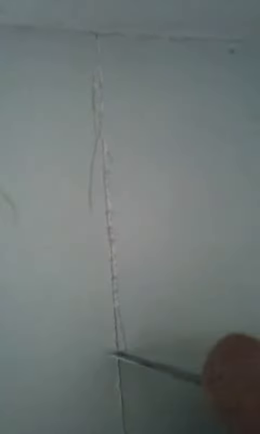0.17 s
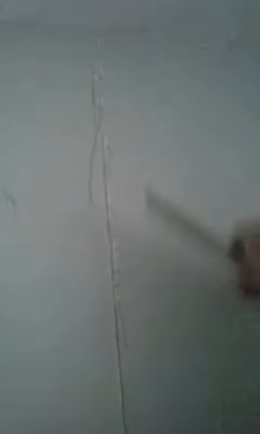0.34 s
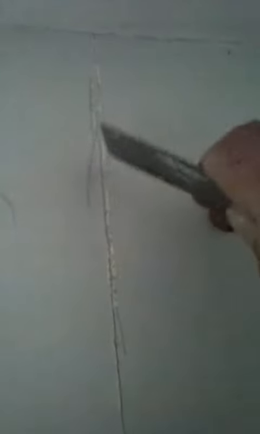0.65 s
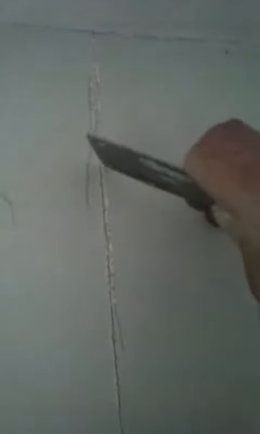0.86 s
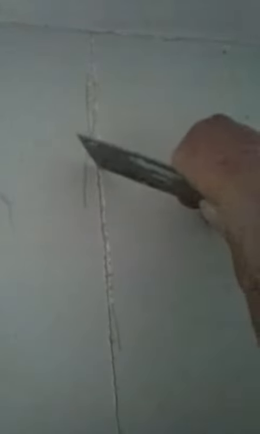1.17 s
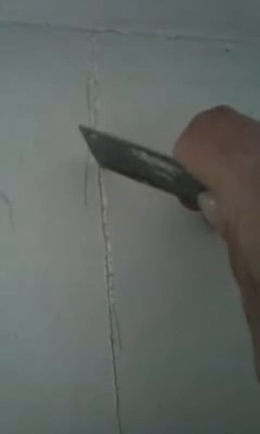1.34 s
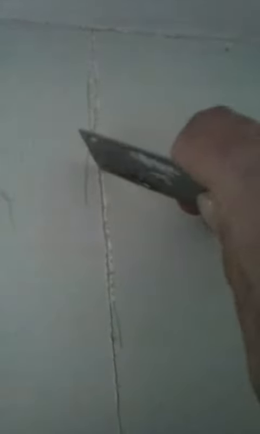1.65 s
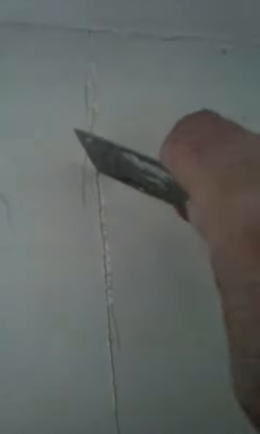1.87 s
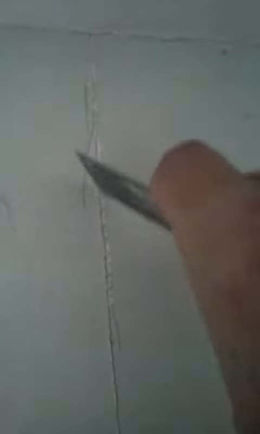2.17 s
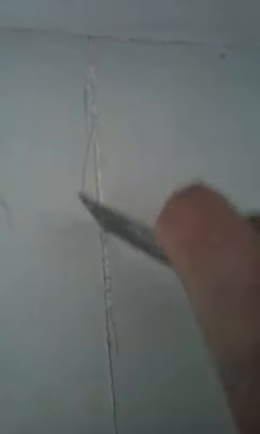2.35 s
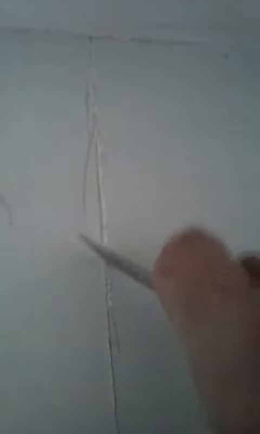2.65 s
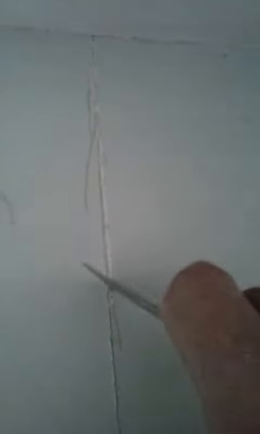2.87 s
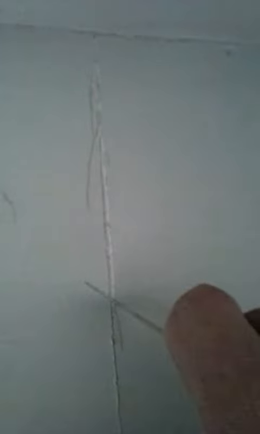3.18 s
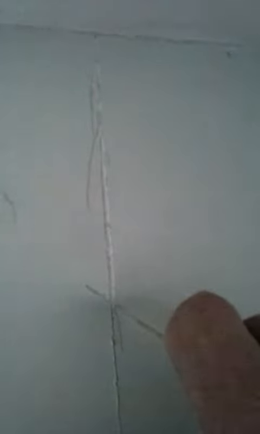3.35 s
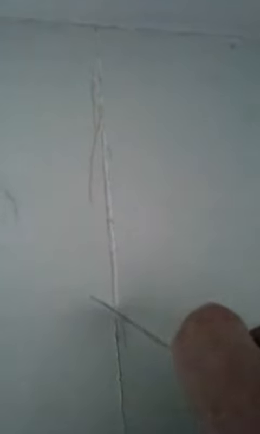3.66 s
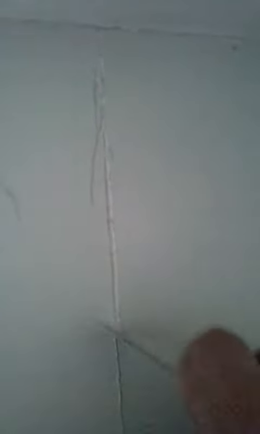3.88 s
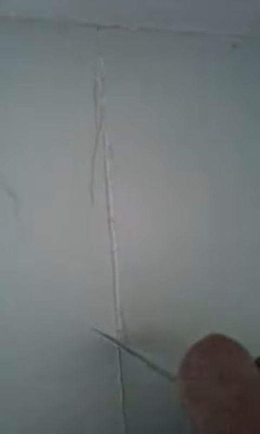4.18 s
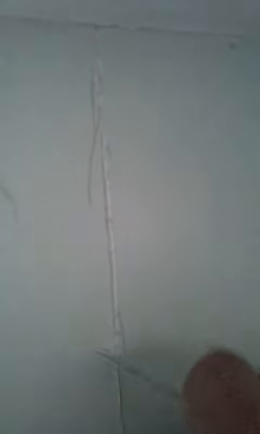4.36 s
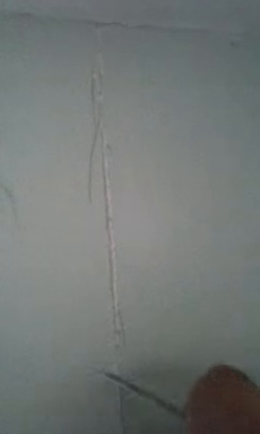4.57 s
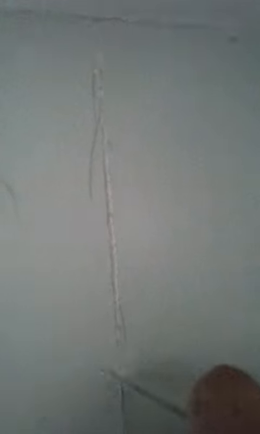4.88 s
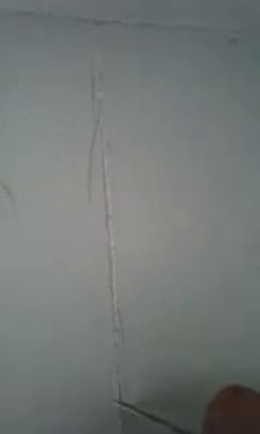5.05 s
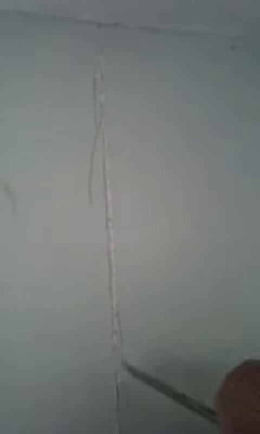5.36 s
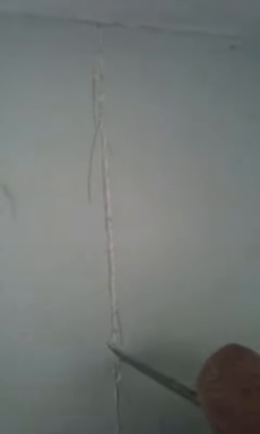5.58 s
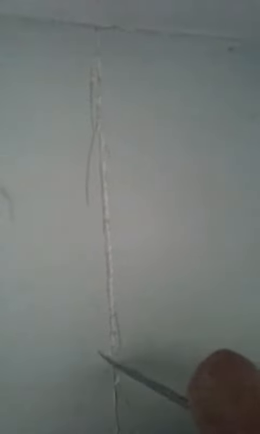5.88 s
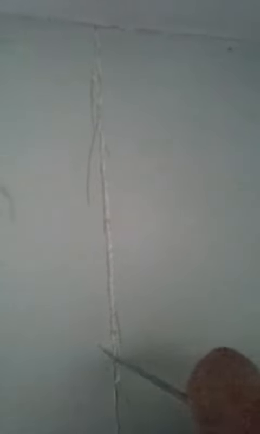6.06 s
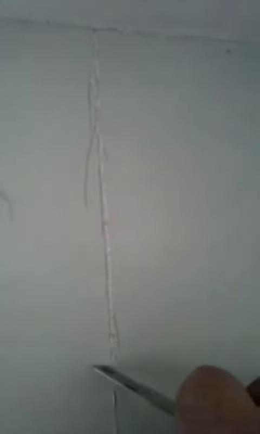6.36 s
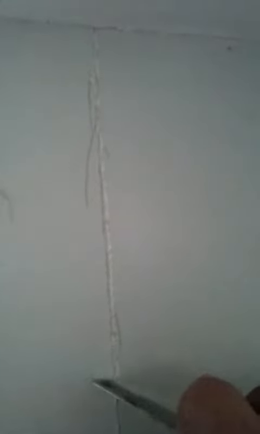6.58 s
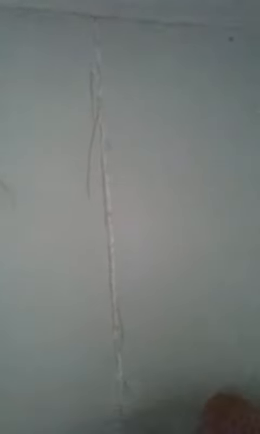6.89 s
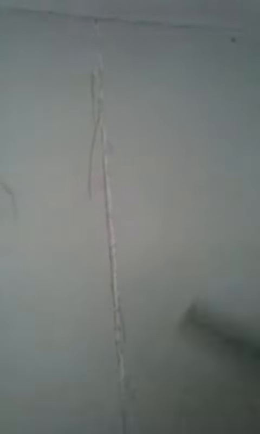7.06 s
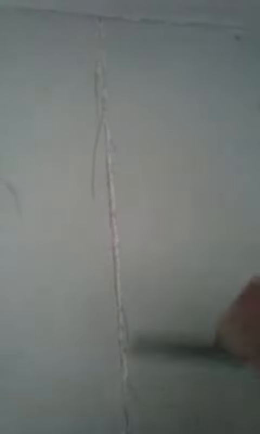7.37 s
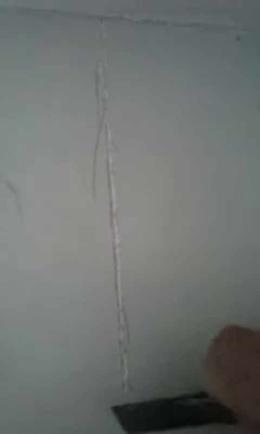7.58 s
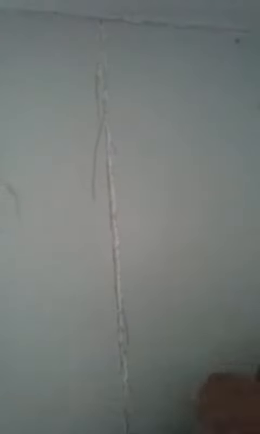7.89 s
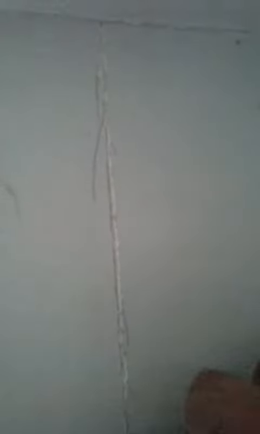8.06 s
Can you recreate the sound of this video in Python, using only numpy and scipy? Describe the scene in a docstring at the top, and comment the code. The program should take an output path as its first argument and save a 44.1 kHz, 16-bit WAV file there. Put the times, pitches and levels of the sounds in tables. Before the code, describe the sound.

Sharp crackling chips and short dry scratches of a metal blade on plaster, close up, with dull knocks between in a bare room.

```python
"""A bare room, where a thin steel blade digs along a crack in a plaster wall close to a small microphone.
The tip grinds through grit, catches, and snaps off chips: crackling noise bursts excite damped modes of wall and blade.
Strokes, brushes and scuffs are shaped noise; knocks and low booms are decaying bursts.
The room adds one clear echo and a short diffuse tail over hiss and hum; the hardest snaps overload the
microphone, and a noise suppressor turns the sound down in the pauses."""
import sys
import numpy as np
from scipy import signal
from scipy.io import wavfile
from scipy.ndimage import uniform_filter1d

SR = 44100
rng = np.random.default_rng(int(sys.argv[2]) if len(sys.argv) > 2 else 0)


def put_to_file(sound):
    """Save the sound as 16-bit audio at rate SR, in the file named by the first command-line argument."""
    columns = np.atleast_2d(sound).T  # one column per channel
    safe = np.clip(columns, -1, 1)
    whole_steps = np.round(safe * 32767)
    wavfile.write(sys.argv[1], SR, whole_steps.astype(np.int16))


N = 362943
TIME = np.arange(N) / SR

# chips snapping off: start_s, crack_db (relative), wall_re_crack_db, blade_re_crack_db
CHIP_SNAPS = [(.0075, 2.5, -18.5, -12), (0.0506, 4, -22, -21), (0.125, -16, -14, -17), (.135, -20, -12, -1),
              (.162, -16.5, -21, -18), (.173, -20, -22, -15), (.183, -20, -20, -11), (1.458, -50, 1, -15),
              (1.706, -39.5, -11, -7), (1.872, -47.5, -7, -12), (2.181, -36, -8.5, -19),
              (2.196, -34.5, -2.5, -7), (2.229, -23, 0.5, -4.5), (2.323, -21, -2.5, -3),
              (2.4, -20, -10, -26), (2.4107, -9.5, -10.5, -9.5), (2.431, -19, -18, -7.5),
              (2.548, -31, -11, -7.5), (2.602, -27, -12, -13), (2.619, -36.5, 6.5, -21),
              (2.731, -10.5, -11.5, -23), (2.804, -20.5, 3, 3.5), (2.864, -14, -5.5, -7.5),
              (2.943, -32, -15, -4), (3.089, -33, -1, 1.5), (3.679, -28, -9.5, -4.5),
              (3.684, -18.5, -10, -2), (3.729, -16.5, -9, -3.5), (3.742, -24.5, 0, -2.5),
              (3.9285, 1, -14, -13.5), (3.9417, -13.5, -16, -14), (3.955, 5, -18.5, -10),
              (4.0797, 7, -18, -10.5), (4.249, -4.5, -14, -18), (4.402, -25.5, -14.5, -9),
              (4.413, -26.5, -4, 6), (4.435, -11.5, -15, -1.5), (4.458, 2.5, -13, -9),
              (4.624, -5.5, -12.5, -4), (4.6623, 6.5, -14, -5), (4.983, -30, -1, 5),
              (5.219, -35.5, -1, 0.5), (5.592, -33, -22, -13), (5.804, -37.5, -2, -0.5),
              (5.834, -42, -11, 3.5), (6.107, -36, -19, -2), (6.455, -29.5, -14, -1),
              (6.524, -30.5, -1, 5.5), (6.569, -20, -4, 10.5), (6.616, -8.5, -7.5, -5.5),
              (6.816, -3.5, -10.5, 0.5), (6.821, -10, -10, -13.5), (6.844, 5.5, -17, -19),
              (6.855, -3, -8, -22), (6.868, -2, -18.5, -7)]
# hollow resonances of the plaster: frequency_hz, width_hz, relative_level_db
PLASTER_MODES = [(381, 85, 3), (770, 140, 2), (1094, 140, 2.5), (1400, 170, -0.5), (1810, 260, -2)]


def snaps(contacts, crack_db=-0.8, wall_db=-1, blade_db=-3.0, ping_db=-9, ping_width_hz=170,
          decay=0.0012, wall_decay=0.0015, split_db=-8, split_s=0.0055, crumb_db=-19, crumb_s=0.025,
          count=3, size=1500):
    """Brittle fracture: each chip breaks in a crackle of milliseconds, splits again, and excites wall, blade and tip."""
    # radiation of the crack itself: frequency_hz, relative_level_db
    crack_spectrum = [(1500, -30.5), (3500, -19.5), (4300, -12.5), (4850, -13), (5450, -8.5), (5950, -11),
                      (7000, -7), (7900, 0.5), (8600, -2.5), (10000, -13.5), (11500, -20.5), (14000, -18.5),
                      (16000, -20)]
    # bending modes while the tip is caught: frequency_hz, width_hz, relative_level_db
    caught_modes = [(2493, 87, -2.5), (2956, 420, -2)]
    t = np.arange(size) / SR
    crack, wall, steel = np.zeros((3, N))
    for (s, db, body_db, ring_db), (stretch, ping_hz) in zip(breaks(), contacts):
        crackle = rng.standard_normal((3, size))
        crackle /= np.sqrt(uniform_filter1d(crackle ** 2, size=30, axis=1))  # evens out its envelope
        split = amp(split_db) * burst(np.maximum(t - split_s * rng.random(), 0), decay / 2)
        # loose crumbs follow at uneven moments
        crumbs = np.zeros(size)
        for late in crumb_s * rng.random(count):
            crumbs += amp(crumb_db) * rng.random() * burst(np.maximum(t - late, 0), decay / 2)
        fracture = burst(t, decay) + split + crumbs
        wall_blow = burst(t, wall_decay) * crackle[1]
        blade_blow = fracture * crackle[2]
        ping_mode = [(ping_hz, ping_width_hz, 0)]
        add(crack, s, amp(db + crack_db) * fracture * crackle[0])
        add(wall, s, amp(db + body_db + wall_db) * strike(wall_blow, PLASTER_MODES))
        add(steel, s, amp(db + ring_db + blade_db) * strike(blade_blow, caught_modes, stretch))
        add(steel, s, amp(db + ping_db) * strike(blade_blow, ping_mode))
    return colour(crack, crack_spectrum) + plaster(wall) + steel


def breaks(hard_db=-2):
    """Rebound: after each snap above hard_db the tip strikes the wall again."""
    # the second strike: delay_s, level_re_snap_db, wall_re_crack_db, blade_re_crack_db
    second_strike = (0.03, -15, -16, -7)
    late_s, drop_db, body_db, ring_db = second_strike
    hard = [(s, db) for s, db, _, _ in CHIP_SNAPS if db > hard_db]
    return CHIP_SNAPS + [(s + late_s, db + drop_db, body_db, ring_db) for s, db in hard]


def ticks(tick_db=-9, tick_hz=9500, decay=0.00047, size=400):
    """Impulsive onset: each snap opens with a thin, bright tick; two snaps open with an extra bright tick."""
    # additional ticks that brighten two snaps: start_s, relative_level_db
    extra_ticks = [(2.41, 0), (6.456, -8.5)]
    t, out = np.arange(size) / SR, np.zeros(N)
    for s, db, *_ in CHIP_SNAPS + extra_ticks:
        add(out, s, amp(db + tick_db) * burst(t, decay) * rng.standard_normal(size))
    return signal.sosfilt(signal.butter(2, tick_hz, "high", fs=SR, output="sos"), out)


def twangs(twang_db=-10, full_bend_db=-10, start_hz=4400, sag_hz_per_s=38000, decay=0.0023, size=1000):
    """Elastic release: the blade springs free with a short falling note, its strength capped by the bend."""
    t, out = np.arange(size) / SR, np.zeros(N)
    phase = 2 * np.pi * np.cumsum(start_hz - sag_hz_per_s * t) / SR
    note = burst(t, decay) * np.sin(phase)
    for s, db, _, _ in CHIP_SNAPS:
        add(out, s, amp(min(db, full_bend_db) + twang_db) * note)
    return out


def grinding(edge_db=-5.5, wall_db=-4, rasp_db=-11, shift_db=5, shift_rate=70):
    """Stick-slip ploughing: fine grains rasp in shifting edge modes, and coarser crumbs tap the wall."""
    # strokes with the tip in the crack: start_s, length_s, relative_level_db, wall_re_grinding_db
    dig_strokes = [(0.048, 0.12, -21.5, -13.5), (1.692, 0.05, -39, -11), (1.84, 0.197, -61.5, 1.5),
                   (2.172, 0.064, -40, -9), (2.217, 0.032, -27, -6), (2.295, 0.17, -30, -6),
                   (2.559, 0.12, -35.5, -5), (2.708, 0.028, -18, -9), (2.755, 0.087, -29.5, -6.5),
                   (2.878, 0.072, -38.5, -5.5), (3.091, 0.057, -34, -12), (4.98, 0.064, -32, -6),
                   (5.611, 0.035, -35.5, -5.5), (5.79, 0.076, -48, -9), (6.16, 0.34, -57.5, 5.5),
                   (8.165, 0.038, -48, -9)]
    # noise of the edge: frequency_hz, relative_level_db
    edge_spectrum = [(1200, -26.5), (2300, -17), (3000, -3), (3750, -14.5), (5250, -10.5), (6800, -4.5),
                     (8300, 0), (10500, -16), (14500, -8)]
    # modes of the ploughing edge: frequency_hz, width_hz, relative_level_db
    rasp_modes = [(3120, 300, -3), (4260, 380, -3.5), (7980, 230, -1.5), (8800, 350, -0.5)]
    grains = grit(per_s=2400, spread_db=3, clump_db=5, clump_rate=150)
    crumbs = grit(per_s=240, spread_db=3, clump_db=2, clump_rate=130)
    edge = grains * sum(stroke(s, length, db) for s, length, db, _ in dig_strokes)
    wall = crumbs * sum(stroke(s, length, db + body) for s, length, db, body in dig_strokes)
    rasp = np.zeros(N)
    for hz, width, db in rasp_modes:
        shifting_gain = amp(db + shift_db * np.tanh(wander(shift_rate)))
        rasp += ring(edge * shifting_gain, [(hz, width, 0)])
    body = plaster(ring(wall, PLASTER_MODES), low_hz=400)
    return amp(edge_db) * colour(edge, edge_spectrum) + amp(rasp_db) * rasp + amp(wall_db) * body


def brushing(brush_db=-2, sing_db=-15, swell_share=0.74):
    """Light friction: fine dust gives a smoother, swelling hiss, and damped blade modes sing along."""
    # the blade brushing over dust: start_s, length_s, relative_level_db, blade_re_brushing_db
    light_strokes = [(0.378, 0.075, -34, -52.5), (2.113, 0.014, -41, -32), (2.151, 0.076, -35.5, -8.5),
                     (3.044, 0.059, -41.5, 1.5), (4.389, 0.022, -35, -3.5), (4.968, 0.056, -34, 4),
                     (5.618, 0.033, -33.5, -4), (6.311, 0.061, -49.5, 5.5), (6.443, 0.05, -36, -6),
                     (7.296, 0.038, -44.5, -9), (7.349, 0.14, -33.5, -10.5), (7.487, 0.081, -30, -14.5),
                     (7.7, 0.025, -40, -28.5)]
    # noise of the dust: frequency_hz, relative_level_db
    dust_spectrum = [(1500, -43), (3800, -16), (5300, -7.5), (6400, -4), (7000, -4.5), (8100, 7.5),
                     (10000, -8), (16000, -18.5)]
    # damped modes of the blade lying on the wall: frequency_hz, width_hz, relative_level_db
    held_modes = [(2850, 330, 6.5), (3280, 350, 5), (3900, 270, 2), (4700, 360, -0.5)]
    grains = grit(per_s=14000, spread_db=1.5, clump_db=4, clump_rate=130)
    dust, blade = np.zeros((2, N))
    for s, length, db, sing in light_strokes:
        dust += stroke(s, length, db, swell_share * length)
        blade += stroke(s, length, db + sing, swell_share * length)
    singing = ring(ring(grains * blade, held_modes), held_modes)
    return amp(brush_db) * colour(grains * dust, dust_spectrum) + amp(sing_db) * singing


def scuffs(width_hz=140):
    """Narrow-band friction: light rubbing stays in one resonance, filtered twice to sharpen its pitch."""
    # scuffs and squeals: start_s, length_s, level_db, pitch_hz
    rubs = [(0.048, 0.067, -31.5, 5650), (0.091, 0.098, -39, 3100), (2.58, 0.12, -41, 8030),
            (2.716, 0.022, -19, 8000), (5.433, 0.17, -58.5, 1108), (6.019, 0.024, -52.5, 949.5),
            (6.61, 0.11, -39.5, 1096), (8.18, 0.049, -55.5, 806)]
    out = np.zeros(N)
    for s, length, db, hz in rubs:
        mode = [(hz, width_hz, 0)]
        out += stroke(s, length, db) * unit(ring(ring(rng.standard_normal(N), mode), mode))
    return out


def knocks(decay=0.0021, spot_db=-4, spot_width_share=.24, size=2500):
    """Soft impact: a dull blow favours the lower wall resonances, and each spot adds its hollow pitch."""
    # dull knocks of the tool on the wall: start_s, peak_db, spot_pitch_hz
    dull_blows = [(0.984, -25.5, 800), (1.738, -39.5, 503), (5.593, -22.5, 1150), (5.621, -30.5, 440),
                  (6.175, -30.5, 606), (7.056, -18, 1276)]
    # response of the wall to a soft blow: frequency_hz, relative_level_db
    knock_spectrum = [(150, -29), (380, -0.5), (650, -5), (1050, 2.5), (1500, -6), (2000, -12), (2500, -16),
                      (3000, -9), (3800, -16.5), (4500, -35), (8000, -51)]
    t, out = np.arange(size) / SR, np.zeros(N)
    for s, db, hz in dull_blows:
        blow = burst(t, decay) * rng.standard_normal(size)
        spot = unit(ring(blow, [(hz, spot_width_share * hz, 0)]))
        knock = unit(colour(blow, knock_spectrum)) + amp(spot_db) * spot
        add(out, s, amp(db) * knock / abs(knock).max())
    return out


def booms(boom_db=0, boom_hz=107, decay=0.025, rumble_db=-3, rumble_hz=210, size=12000):
    """Low-frequency resonance: a short low boom of the room with some rumble."""
    # low booms: start_s, level_db
    low_booms = [(0.093, -32), (0.163, -34.5), (2.419, -42.5), (2.819, -44.5), (3.114, -46.5), (3.954, -34),
                 (4.456, -33), (4.665, -28), (5.02, -36.5), (6.601, -43), (6.854, -28), (7.74, -56.5)]
    t, out = np.arange(size) / SR, np.zeros(N)
    band = signal.butter(3, [70, rumble_hz], "band", fs=SR, output="sos")
    for s, db in low_booms:
        boom = burst(t, decay) * np.sin(2 * np.pi * boom_hz * t * rng.normal(1, 0.034))
        rumble = burst(t, decay / 2) * unit(signal.sosfilt(band, rng.standard_normal(size)))
        add(out, s, amp(db + boom_db) * (boom + amp(rumble_db) * rumble))
    return out


def room(sides, echo_s=.0135, echo_db=-19.0, tail_db=-10.5):
    """Reflection: the first side, facing the microphone, gives one early echo; all sides feed the tail."""
    out = sides[0].copy()
    add(out, echo_s, amp(echo_db) * sides[0])
    diffuse = sum(signal.oaconvolve(side, tail())[:N] for side in sides)
    return out + amp(tail_db) * diffuse / np.sqrt(len(sides))


def tail(build_s=0.0062):
    """Reverberation: diffuse reflections build up, then die exponentially, band by band."""
    # time to fall by 60 dB: frequency_hz, decay_s
    decay_times = [(100, 0.36), (300, 0.65), (1000, 0.49), (3000, 0.54), (12000, 0.415)]
    # spectrum of the reflections: frequency_hz, relative_level_db
    room_spectrum = [(50, -0.5), (110, 18.5), (330, 6.5), (450, 4.5), (620, 1), (1050, 3), (1400, 0.5),
                     (1750, 4.5), (2350, 7.5), (3000, -8.5), (3600, 1), (4300, -4.5), (5400, 2.5),
                     (6500, -2), (8000, -4)]
    hz, frame_s, bands = signal.stft(rng.standard_normal(SR), SR, nperseg=256)
    bands *= amp(-60 * frame_s / read(decay_times, hz)[:, None])
    wash = signal.istft(bands, SR, nperseg=256)[1][:SR]
    wash *= 1 - np.exp(-(np.arange(SR) / SR / build_s) ** 2)
    return colour(wash / np.linalg.norm(wash), room_spectrum)


def background(hum_db=-13, line_hz=265, line_db=-70, flicker_db=6.5, flicker_rate=260):
    """Stationary noise, modulated: room tone and thin flickering hiss drift together over a faint wavering hum."""
    # low room tone: frequency_hz, relative_level_db
    tone_spectrum = [(25, -23), (65, -4.5), (125, -1.5), (190, -15.5), (400, -14.5), (900, -18),
                     (5000, -32.5), (9000, -49)]
    # thin hiss: frequency_hz, relative_level_db
    hiss_spectrum = [(3000, -32.5), (5000, -30), (6500, -18), (7400, -8), (8000, 1), (9000, 0.5),
                     (10000, -6), (12500, -10.5), (16000, -18)]
    # common drift of room tone and hiss: time_s, level_db
    drift = [(0, -37.5), (.75, -52.5), (1.4, -50), (2.9, -44), (3.5, -50), (5, -45), (6.02, -49.5),
             (6.35, -46), (8.23, -48.5)]
    tone = amp(hum_db) * colour(rng.standard_normal(N), tone_spectrum)
    line = amp(line_db) * (1 + wander(3.4) / 2) * np.sin(2 * np.pi * line_hz * TIME + wander(5.8))
    flicker = amp(flicker_db * np.tanh(wander(flicker_rate)))
    hiss = unit(colour(rng.standard_normal(N), hiss_spectrum) * flicker)
    return line + (tone + hiss) * amp(np.interp(TIME, *np.transpose(drift)))


def grit(per_s, spread_db, clump_db, clump_rate):
    """Random impulses: grains of uneven size break under the edge, in clumps as it sticks and slips."""
    size = amp(abs(spread_db) * np.minimum(rng.exponential(1, N), 4)) * rng.choice([-1, 1], N)
    breaking = rng.random(N) < per_s / SR
    return unit(size * breaking * amp(clump_db * np.tanh(wander(clump_rate))))


def stroke(start, length, db, attack=0.029, release=0.0067):
    """Amplitude envelope: a stroke bites in linearly, holds at db, and lets go exponentially (times in s)."""
    t = TIME - start
    return amp(db) * np.clip(t / attack, 0, 1) * np.exp(-np.clip((t - length) / release, 0, 20))


def burst(t, decay):
    """Transient envelope: swells to peak 1 at time decay, then dies."""
    u = t / max(decay, 1e-4)
    return u * np.exp(1 - u)


def strike(blow, modes, stretch=1):
    """Modal excitation: a short blow gives all its energy to the modes."""
    return unit(ring(blow, modes, stretch)) * np.std(blow)


def ring(x, modes, stretch=1, size=1024):
    """Modal superposition: damped sines, neighbours in opposite phase; white noise keeps its power."""
    t = np.arange(size) / SR
    taps = np.zeros(size)
    for k, (hz, width, db) in enumerate(modes):
        decaying = amp(db) * width * np.exp(-np.pi * width * t)
        taps += (-1) ** k * decaying * np.sin(2 * np.pi * hz * stretch * t)
    return signal.oaconvolve(x, taps / np.linalg.norm(taps))[:len(x)]


def plaster(x, low_hz=190, high_hz=3000):
    """Band-limited radiation: a patch of wall radiates neither deep bass nor treble."""
    return signal.sosfilt(signal.butter(2, [low_hz, high_hz], "band", fs=SR, output="sos"), x)


def colour(x, points, size=4096):
    """Minimum-phase filtering: a causal filter with the given spectrum; white noise keeps its power."""
    log_gain = np.log(amp(read(points, abs(np.fft.fftfreq(size, 1 / SR)))))
    response = np.exp(np.conj(signal.hilbert(log_gain)))
    taps = np.fft.ifft(response).real[:size // 2]
    return signal.oaconvolve(x, taps / np.linalg.norm(taps))[:len(x)]


def read(points, hz):
    """Interpolation: joins (frequency_hz, value) points on a log-frequency axis."""
    f, value = np.transpose(points)
    return np.interp(np.log(hz + 1), np.log(f), value)


def wander(rate):
    """Slow random modulation: a curve with about `rate` turns a second and spread near 1."""
    return np.interp(TIME * rate, np.arange(N), rng.standard_normal(N))


def amp(db):
    """Level to amplitude: decibels to gain."""
    return 10 ** (np.asarray(db) / 20)


def unit(x):
    """Normalisation: scales to rms 1."""
    return x / np.sqrt(np.mean(x ** 2) + 1e-20)


def add(mix, s, sound):
    """Linear superposition: mixes a sound in at time s."""
    part = mix[max(round(s * SR), 0):][:len(sound)]
    part += sound[:len(part)]


def scene(bloom_db=-10, count=4, grip_spread=.025, ping_hz=(7600, 9000)):
    """Directivity: fractures send each side its own fine pattern; knocks stir the room more than snaps."""
    # from snap to snap the contact point shifts: pitch factor of the blade, ping of the tip in Hz
    contacts = rng.uniform([1 - grip_spread, ping_hz[0]], [1 + grip_spread, ping_hz[1]], (len(breaks()), 2))
    shared = grinding() + brushing() + scuffs() + ticks() + twangs()
    sides = [snaps(contacts) + knocks() + shared for _ in range(count)]
    bloom = amp(bloom_db) * signal.oaconvolve(knocks(), tail())[:N]
    return (room(sides) + bloom + booms() + background())[None]


def suppress(x, quiet_db=-65, knee_db=9, suppress_db=10.5, sense_s=0.061):
    """Downward expansion: turns the sound down by up to suppress_db while little happens in the middle band."""
    middle = signal.sosfilt(signal.butter(4, [400, 5500], "band", fs=SR, output="sos"), x)
    power = abs(uniform_filter1d(middle ** 2, max(round(sense_s * SR), 1)))
    level_db = 10 * np.log10(power + 1e-12)
    return x * amp(-suppress_db * (1 - np.tanh((level_db - quiet_db) / knee_db)) / 2)


def record(dry, ceiling=.86, edge_hz=15900):
    """Saturation: the input overloads at the ceiling; then the noise suppressor and a band limit."""
    clipped = dry / (1 + (dry / ceiling) ** 10) ** (1 / 10)
    low_pass = signal.firwin(401, edge_hz, window=("kaiser", 8), fs=SR)
    return signal.oaconvolve(suppress(clipped), low_pass[None], "same")


dry = scene()
out = record(dry)
put_to_file(out)
```